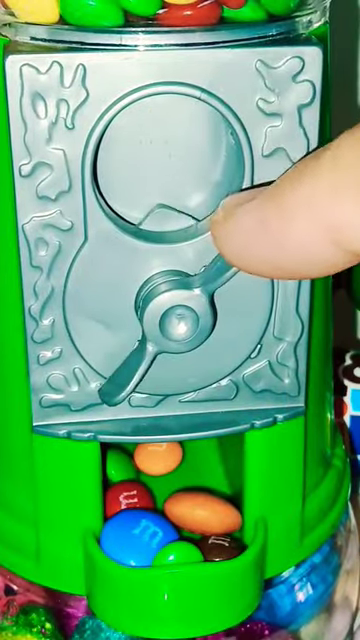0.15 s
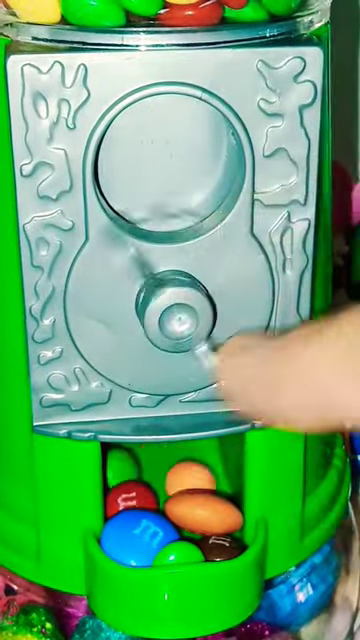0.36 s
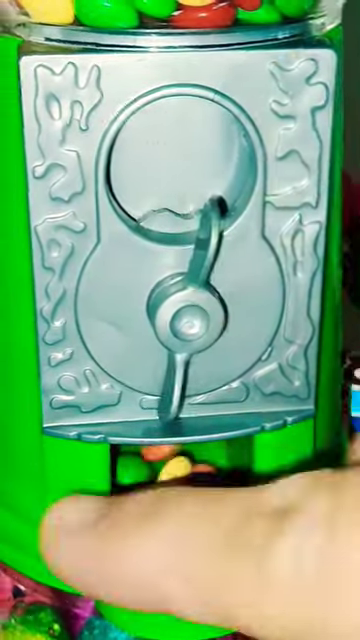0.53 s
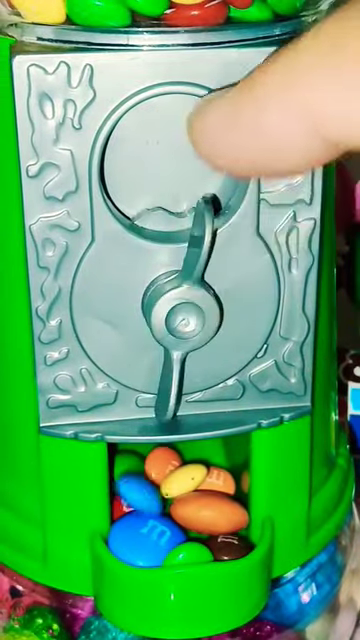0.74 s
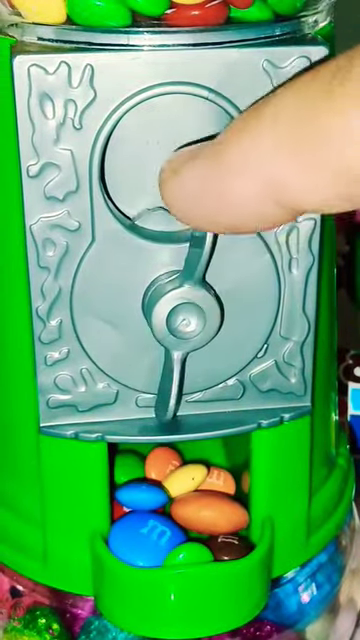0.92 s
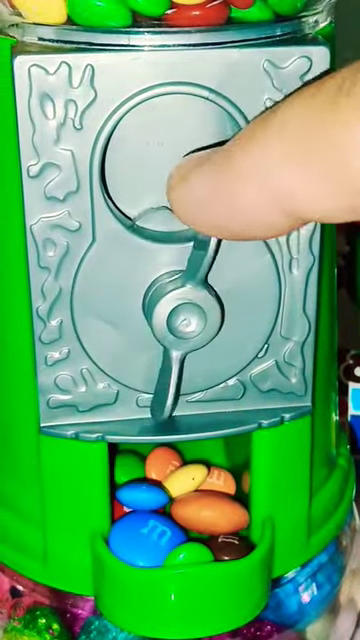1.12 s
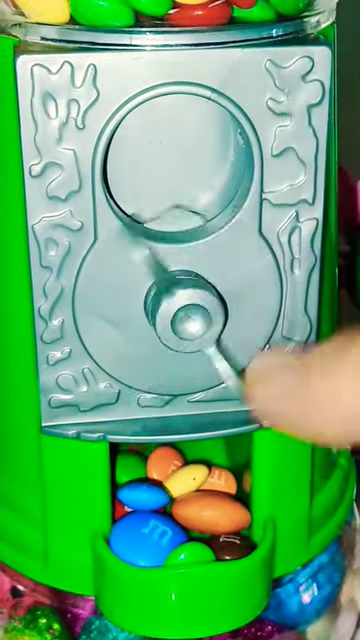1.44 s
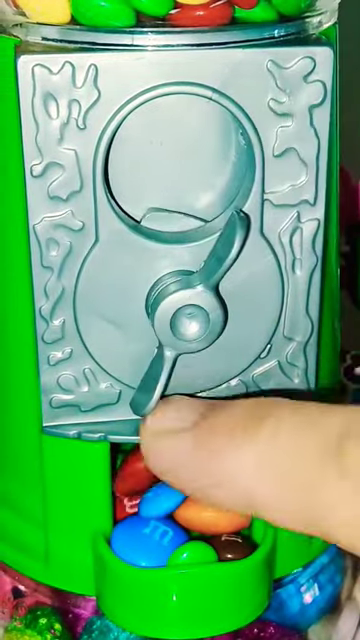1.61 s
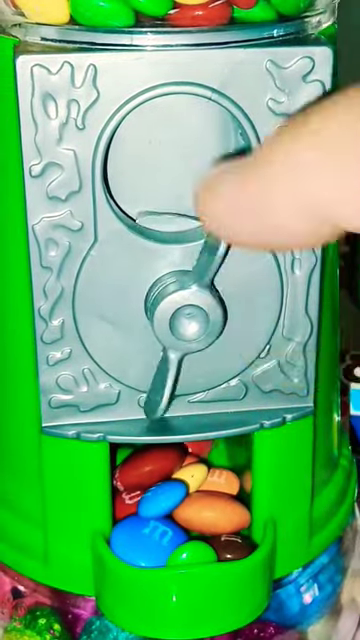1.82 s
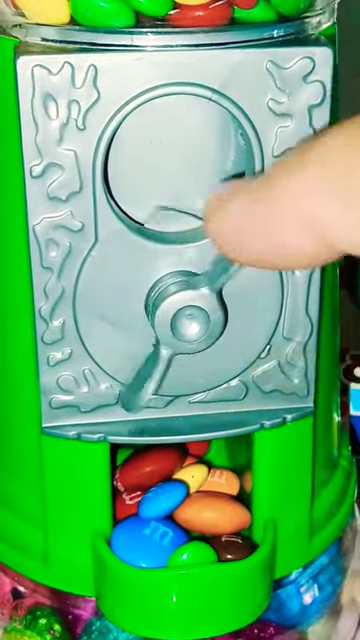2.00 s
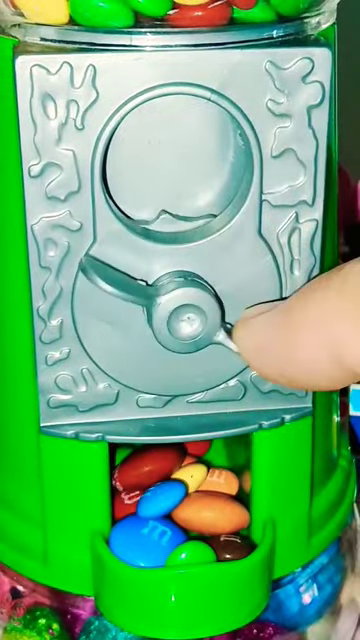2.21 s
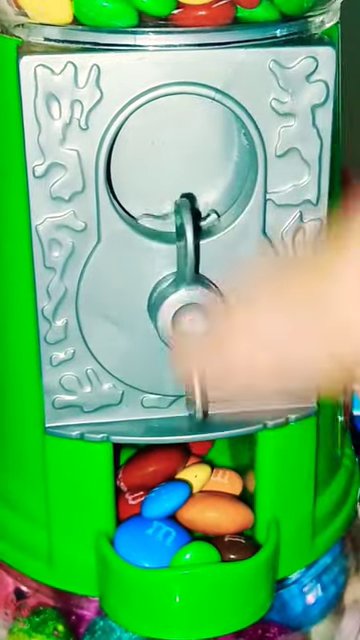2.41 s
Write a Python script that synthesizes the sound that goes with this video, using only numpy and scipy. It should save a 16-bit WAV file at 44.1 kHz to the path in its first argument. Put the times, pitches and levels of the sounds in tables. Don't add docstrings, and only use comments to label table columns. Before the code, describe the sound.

Plastic crank of a small candy dispenser rattles and clacks in three bursts, with brief squeaks

```python
import sys
import numpy as np
from scipy import signal
from scipy.fft import rfft, irfft
from scipy.io import wavfile
from scipy.ndimage import uniform_filter1d, minimum_filter1d

SR = 44100
rng = np.random.default_rng(int(sys.argv[2]) if len(sys.argv) > 2 else 0)


def unload_audio(sound):
    columns = np.transpose(np.atleast_2d(sound))
    steps = np.round(np.clip(columns, -1, 1) * 32767)
    wavfile.write(sys.argv[1], SR, steps.astype(np.int16))


def how_loud(loudness_db):
    steps = np.asarray(loudness_db, float) / 20
    return 10 ** steps


N = 112454

# (frequency [Hz], level [dB per Hz])
KNOCK_COLOUR = [(350, -48), (600, -34), (790, -15), (3150, -10), (4280, -9), (4900, -11.5), (8050, -3),
                (13600, -12.5), (16000, -22)]
PATCH_DB = 3.5


def at_hz(points, hz):
    table = np.array(points)
    return np.interp(np.log(hz), np.log(table[:, 0]), table[:, 1])


def over_time(points):
    return np.interp(np.arange(N) / SR, *np.transpose(points))


def rms_one(x):
    return x / np.sqrt(np.mean(x ** 2) + 1e-20)


def left_right(db):
    return how_loud(db * np.array([[0.5], [-0.5]]))


def ring(clicks, hz, t60):
    r = how_loud(-60 / (t60 * SR))
    w = 2 * np.pi * hz / SR
    return signal.lfilter([0, np.sin(w)], [1, -2 * r * np.cos(w), r * r], clicks + 1e-18)


def heard(clicks, hz, t60):
    # (frequency [Hz], level difference [dB])
    sides = [(700, 11.5), (1300, -11), (2400, 1), (4400, 5), (6500, 12), (9000, -2), (14000, -8)]
    return ring(clicks, hz, t60) * left_right(at_hz(sides, hz))


def air():
    # (frequency [Hz], level [dB per Hz])
    air_colour = [(16, 1), (60, -14), (360, -11), (540, -18.5), (1000, -22), (7000, -43), (10500, -46.5),
                  (15500, -38), (17000, -57)]
    # (frequency [Hz], likeness [0-1])
    likeness = [(40, 0.34), (500, 0.65), (2000, 0), (8000, 0)]
    # (time [s], level [dB])
    hum_level = [(0, -54), (0.699, -62.5), (.82, -53.5), (1.0, -59.5), (1.5, -57), (1.75, -55.5),
                 (2.299, -48.5), (2.55, -58)]
    air_db, hum_hz, hum_width_hz = -53.5, 92.8, 30

    hz = np.maximum(np.arange(N // 2 + 1) * SR / N, 1)
    mid, side = rfft(rng.standard_normal((2, N))) * how_loud(at_hz(air_colour, hz)) * (hz > 15)
    alike = np.clip(at_hz(likeness, hz), 0, 1)
    noise = irfft(np.sqrt(1 + alike) * mid + np.sqrt(1 - alike) * side * [[1], [-1]], N)
    hum = ring(rng.standard_normal(N), hum_hz, 9.3 / hum_width_hz)
    return how_loud(air_db) * rms_one(noise) + how_loud(over_time(hum_level)) * rms_one(hum)


def room(x):
    t60_s, level_db, start_s = 0.19, -9.5, 0.0045
    t = np.arange(SR // 2) / SR
    tail = rng.standard_normal((2, len(t))) * how_loud(-60 * t / t60_s) * (t > start_s)
    tail = signal.sosfilt(signal.butter(1, 9000, fs=SR, output="sos"), tail)
    tail = tail / np.sqrt(np.sum(tail ** 2) / 2)
    return how_loud(level_db) * signal.fftconvolve(x, tail, axes=1)[:, :N]


def jolts():
    # (time [s], level [dB], left minus right [dB])
    jolt_table = [
        (0.274, -31, 13),
        (0.382, -20.5, 7),
        (0.586, -16, -6.5),
        (1.407, -42, 26.5),
        (2.090, -30, 23),
    ]
    jolt_s, swing_s, swing = 0.004, 0.034, 0.36

    t = np.arange(SR // 5) / SR
    push = np.exp(-t / jolt_s) * np.minimum(t / 0.00035, 1)
    back = swing * (t / swing_s * np.exp(1 - t / swing_s)) ** 2
    out = np.zeros((2, N + SR))
    for s, db, pan_db in jolt_table:
        out[:, int(s * SR):][:, :len(t)] += (back - push) * how_loud(db) * left_right(pan_db)
    return signal.sosfilt(signal.butter(1, 8, "high", fs=SR, output="sos"), out[:, :N])


def axle():
    # (time [s], length [s], start frequency [Hz], end frequency [Hz], level [dB])
    squeaks = [
        (1.126, .066, 2415, 2442, -41),
        (1.192, .036, 2445, 2435, -55),
        (1.293, .026, 2680, 1950, -19),
        (1.362, .022, 4720, 4550, -38),
        (1.379, .018, 4250, 4400, -17),
    ]
    overtones_db = [-2.5, -1, 5.5, -0.5]
    growth, pan_db = 0.36, 10.5

    t = np.arange(N) / SR
    out = np.zeros((2, N))
    rough = rms_one(uniform_filter1d(rng.standard_normal((4, N)), size=30))
    waver = rms_one(uniform_filter1d(rng.standard_normal(N), size=90))
    for s, length, from_hz, to_hz, db in squeaks:
        u = np.clip((t - s) / length, 0, 1)
        hz = from_hz + (to_hz - from_hz) * u ** 1.2 + from_hz * how_loud(db - 20) * waver
        phase = 2 * np.pi * np.cumsum(hz) / SR
        swell = np.sin(np.pi * u ** ((to_hz / from_hz) ** 1.1)) ** 3.3
        for k, tone_db in enumerate(overtones_db):
            tone_hz = from_hz * (k + 1)
            if tone_hz >= 13500:
                continue
            level_db = tone_db + db + k ** 0.55 * growth * (db + 14.0) * 2
            level_db -= 13 * (tone_hz > 11000)
            tone = swell * (1 + how_loud(db + 7.0) * rough[k]) * np.sin((k + 1) * phase)
            out += how_loud(level_db) * left_right(pan_db) * tone
    return out


def taps():
    # (time [s], peak level [dB], frequency [Hz])
    tap_table = [(0.176, -34, 770), (0.22, -27, 1250), (0.234, -23, 845), (0.319, -25.5, 783),
                 (0.361, -19.5, 828), (1.331, -17.5, 816), (1.357, -22.5, 845), (1.519, -25, 750),
                 (1.556, -31.5, 1520), (1.637, -24, 846), (1.743, -27, 817), (1.9, -32, 760),
                 (1.953, -36, 830), (2.04, -21.5, 1400), (2.262, -22.5, 850), (2.041, -13.5, 772)]
    t60_s, rise_s = 0.015, 0.00041

    t = np.arange(SR // 10) / SR
    out = np.zeros(N + SR)
    for s, db, hz in tap_table:
        pair = np.sin(2 * np.pi * hz * t) + 0.48 * np.sin(2 * np.pi * 3.4 * hz * t)
        out[int(s * SR):][:len(t)] += how_loud(db - 60 * t / t60_s) * pair * np.minimum(t / rise_s, 1)
    return out[:N]


def shell_modes():
    # (frequency [Hz], level [dB], t60 [s])
    walls = [(4120, -33, .02), (4300, -31, 0.049), (4700, -34, 0.06), (5490, -29.5, 0.032),
             (5870, -34, 0.017), (7140, -26.5, 0.019), (7820, -27.5, 0.011)]
    crack_db, crack_t60_s = -21.5, 0.015
    body_db, body_t60_s, body_tilt_db = -17.5, 0.019, 3.5

    crack = [(hz, crack_db + at_hz(KNOCK_COLOUR, hz), crack_t60_s)
             for hz in np.geomspace(2700, 15000, num=48)]
    body = [(hz, body_db + body_tilt_db * np.log2(hz / 740), body_t60_s)
            for hz in np.geomspace(780, 2500, num=10)]
    return crack + body + walls


def rolling(modes):
    # (time [s], level [dB])
    motion = [(0, -75.5), (.10, -63.5), (0.131, -80), (0.163, -53), (0.205, -60.5), (0.268, -36.5),
              (0.601, -46), (.85, -70.5), (1.09, -74.5), (1.124, -54.5), (1.2, -69.5), (1.289, -47.5),
              (1.45, -41.5), (1.621, -51), (1.69, -70.5), (2.084, -51.5), (2.097, -33.5), (2.4, -72.5)]
    grains_per_s, grain_db = 550, -27

    surge_db = 3.52 * rms_one(uniform_filter1d(rng.standard_normal(N), size=400))
    scatter_db = 4.92 * np.minimum(rng.exponential(size=N), 5)
    sizes = how_loud(grain_db + over_time(motion) + surge_db + scatter_db)
    chance = rng.random((2, N))
    roll = np.cumsum(rng.standard_normal(N)) / 60
    out = np.zeros((2, N))
    for k, (hz, _, t60) in enumerate(modes):
        born = np.roll(chance, 977 * k, axis=1) < grains_per_s / SR
        place_db = PATCH_DB * np.cos(roll + 2 * np.pi * np.log2(hz))
        clicks = born * sizes * how_loud(at_hz(KNOCK_COLOUR, hz) + 14.5 + place_db)
        out += heard(clicks, hz, t60)
    return out


def knocks(modes):
    # (time [s], peak level [dB], hollow body re peak [dB], brightest frequency [Hz])
    knock_table = [(0.2096, -12.5, -27.5, 7470), (0.2535, -8.5, -21, 6530), (0.2641, -4.5, -26.5, 9900),
                   (0.266, -20, -25.5, 8500), (0.2686, -6.5, -16.5, 8950), (0.273, -5, -28, 7860),
                   (0.2762, -2.5, -43.5, 8360), (0.3449, -6, -23, 7770), (0.3503, -20.5, -24, 6000),
                   (0.355, -17, -22, 7530), (0.3729, -9.5, -11, 6700), (0.381, -3, -41, 6860),
                   (0.385, -11.5, -42, 6940), (0.3971, -4.5, -28.5, 8700), (0.4113, -10, -22, 8830),
                   (0.4314, -9.5, -15.5, 7020), (0.446, -7.5, -27, 7800), (0.4556, -2.5, -35, 8580),
                   (0.4664, -13.5, -27.5, 7900), (0.4734, -4.5, -22, 9000), (0.4965, -8.5, -25.5, 8400),
                   (0.5126, -23.5, -34, 4500), (0.5173, -8.5, -15.5, 8570), (0.538, -9.5, -22, 8300),
                   (0.5551, -21, -6.5, 7870), (0.5861, -1.5, -42.5, 7200), (0.6316, -10, -17.5, 6150),
                   (0.6524, -5.5, -15.5, 7380), (0.7232, -10, -20.5, 7000), (0.751, -31, -9, 7000),
                   (0.7996, -25.5, -20, 6700), (0.8197, -25, -14, 7060),
                   (1.3069, -1.5, -28, 6560), (1.3122, -4, -12.5, 3950), (1.3206, -15, -5, 6500),
                   (1.3587, -23, -3, 4600), (1.398, -13.5, -43.5, 4550), (1.4053, -0.5, -10.5, 6700),
                   (1.4143, -7.5, -43, 5170), (1.4378, -6.5, -38, 7500), (1.446, -4.5, -11.5, 7000),
                   (1.459, -17, -28, 7120), (1.4837, -1, -35, 7870), (1.4924, -5, -17.5, 9100),
                   (1.5021, -4, -45, 5800), (1.5292, -6, -29, 6450), (1.558, -24.5, -7, 6800),
                   (1.6238, -25.5, -10.5, 9290), (1.6418, -11, -19, 4100), (1.6476, -7, -31, 8800),
                   (1.6674, -10.5, -17, 5360), (1.6842, -13, -28, 8800), (1.6913, -12.5, -5, 4100),
                   (1.697, -14.5, -20.5, 7020), (1.7855, -30, -8, 6730), (1.7981, -27, -15, 5900),
                   (1.8528, -11, -22.5, 7160), (1.862, -21.5, -38.5, 4700), (1.997, -18.5, -45.5, 6470),
                  (2.0033, -10.5, -26, 4330), (2.029, -24.5, -1, 6000), (2.0397, -4.5, -11, 7500),
                  (2.0422, -3, -41, 7760), (2.0528, -15, -30, 3920), (2.0601, -15, -15.5, 3890),
                  (2.0897, -3, -11.5, 7750), (2.0995, -16.5, -33, 7020), (2.1186, -17, -28, 7440),
                  (2.2155, -22.5, -5, 4900), (2.2444, -26, -2.5, 5500), (2.2637, -15.5, -9.5, 4200),
                  (2.279, -38, -11.5, 6000), (2.5444, -43.5, -10, 6870)]
    contact_s, contact_db = 0.0011, np.array([-3.0, -2.4, -3.5, -10.5])
    focus_db, focus_oct = 9.5, 0.52
    soft_dulling, soft_hz = 0.55, 9000
    own_share = 0.99

    s, db, body_db, bright_hz = np.transpose(knock_table)
    late = contact_s * np.cumsum(rng.random((len(s), 4)), axis=1) * (np.arange(4) > 0)
    at = ((s[:, None] + late) * SR).astype(int)
    place, spacing = rng.random((len(s), 2)).T
    out = np.zeros((2, N))
    for hz, level_db, t60 in modes:
        if hz < 2600:
            colour_db = body_db
        else:
            colour_db = focus_db * np.exp(-(np.log2(hz / bright_hz) / focus_oct) ** 2)
        dull_db = soft_dulling * db * max(np.log2(hz / soft_hz), 0)
        place_db = PATCH_DB * np.cos(2 * np.pi * (place + (1 + spacing) * np.log2(hz)))
        strength = how_loud(db + colour_db + dull_db + level_db + place_db)
        draw = rng.standard_normal((len(s), 3, 4))
        draw = np.sign(draw) * np.abs(draw) ** 0.66
        force = (draw[:, :1] + own_share * draw[:, 1:]) * strength[:, None, None]
        clicks = np.zeros((2, N))
        for side in range(2):
            np.add.at(clicks[side], at, force[:, side] * how_loud(contact_db))
        out += heard(clicks, hz, t60)
    return out


def scene():
    # (time [s], left minus right [dB])
    shade = [(0.1, 0), (0.5, -1.5), (0.75, 3), (1.2, -1), (1.5, -4), (1.75, 2.5), (2.1, -1), (2.4, 3)]
    lead_s = 0.0002218
    thin_hz, top_hz = 778, 15300

    modes = shell_modes()
    toy = knocks(modes) + rolling(modes) + axle()
    toy *= left_right(over_time(shade))
    toy[1] = np.interp(np.arange(N) - lead_s * SR, np.arange(N), toy[1])
    toy += taps()
    toy = signal.sosfilt(signal.butter(4, [thin_hz, top_hz], "band", fs=SR, output="sos"), toy)
    return toy + room(toy) + jolts() + air()


def starve(x):
    starve_db, starve_hz = -37.5, 9100
    whim_db = 13

    hz, t, z = signal.stft(x, SR, nperseg=512)
    power = np.abs(z) ** 2
    loud = -minimum_filter1d(-power[:, hz > 2000].sum(axis=(0, 1)), size=7)
    band = ((hz - starve_hz) // 700).astype(int)
    band[np.abs(hz - 3050) < 180] = 10
    whim = rng.standard_normal((11, len(t) // 8 + 1))
    whim = whim_db * np.repeat(whim, 8, axis=1)[:, :len(t)]
    for k in range(11):
        threshold_db = starve_db + whim[k] / 2 + 9.0 * (k == 10)
        weak = power[:, band == k].sum(axis=(0, 1)) < loud * how_loud(2 * threshold_db)
        z[:, band == k] *= 1 - weak
    return signal.istft(z, SR, nperseg=512)[1][:, :N]


def band_limit(x):
    return signal.sosfilt(signal.butter(12, 16630, fs=SR, output="sos"), x)


def record(dry):
    rounded = 0.79 * np.tanh(dry / 0.81)
    top_cut = signal.cheby2(10, 60, 16800, fs=SR, output="sos")
    mix = starve(signal.sosfilt(top_cut, rounded))
    return band_limit(mix)


dry = scene()
out = record(dry)
unload_audio(out)
```